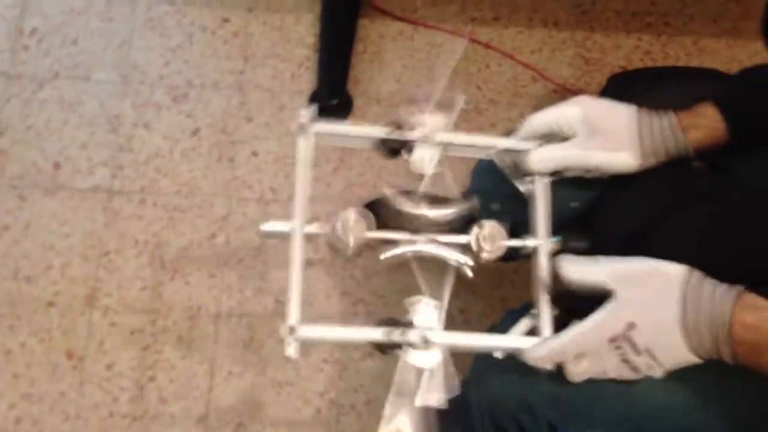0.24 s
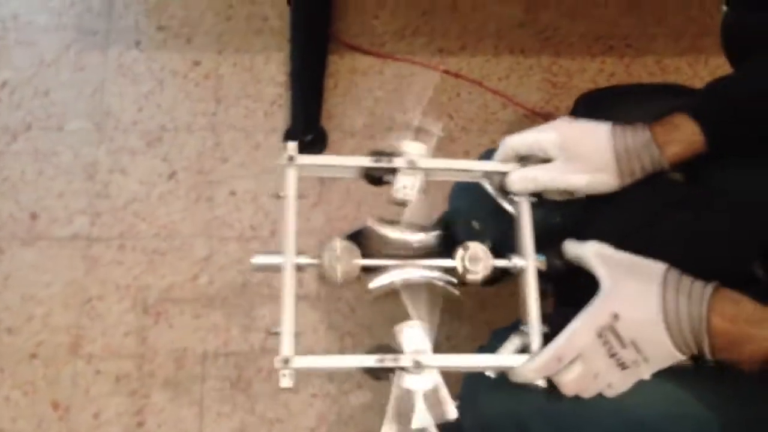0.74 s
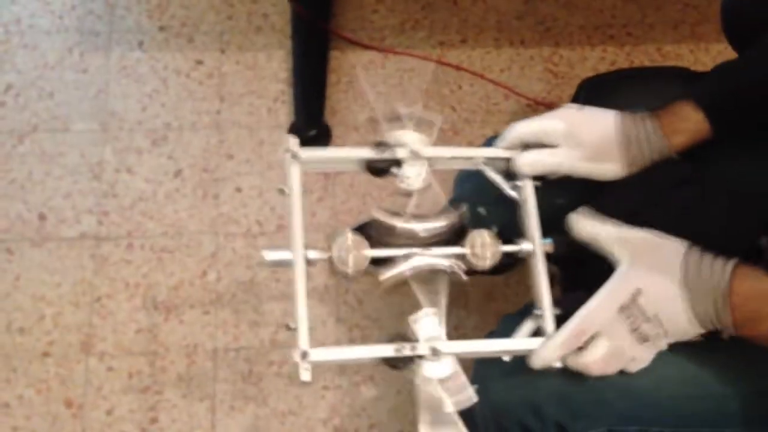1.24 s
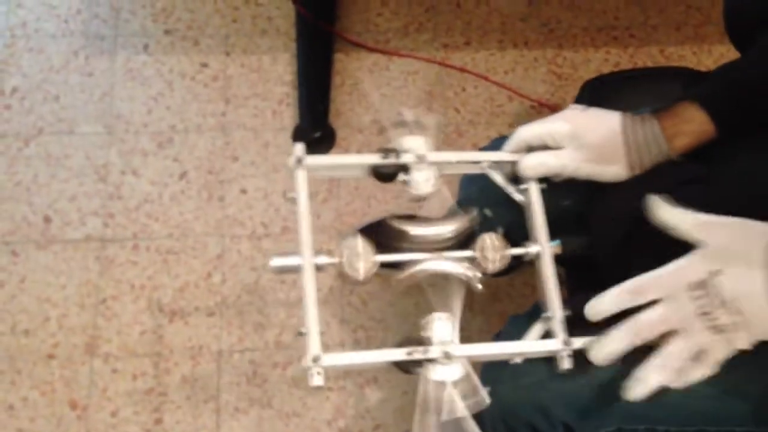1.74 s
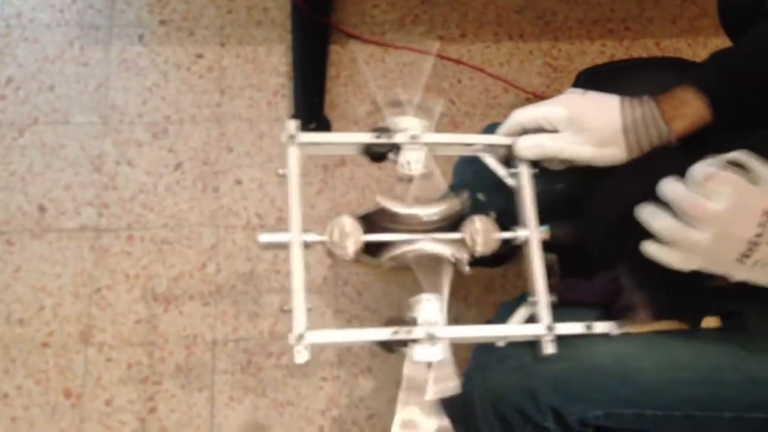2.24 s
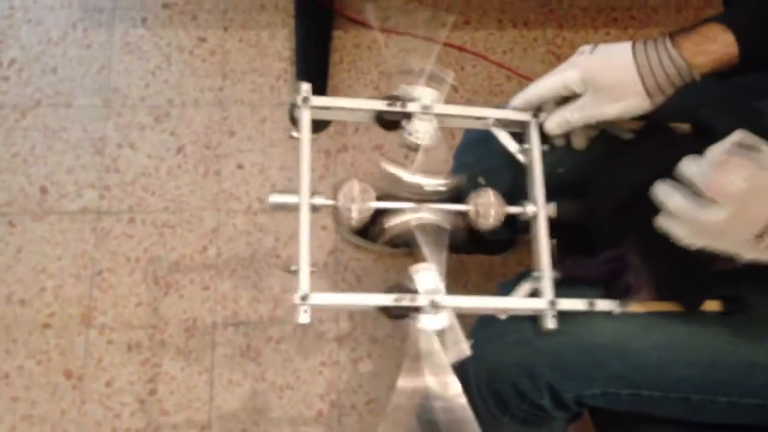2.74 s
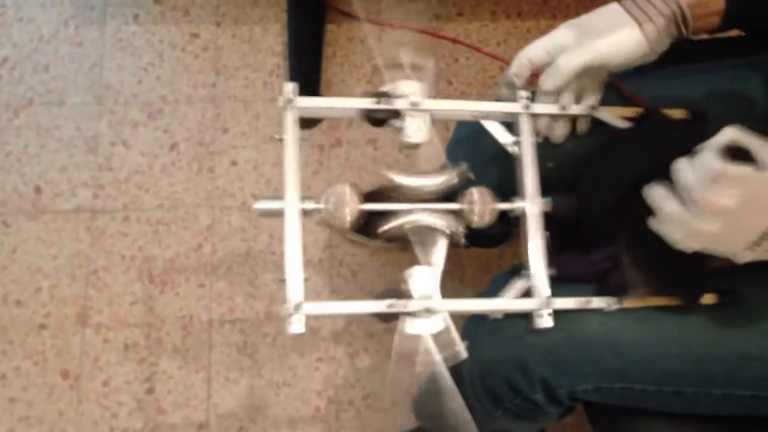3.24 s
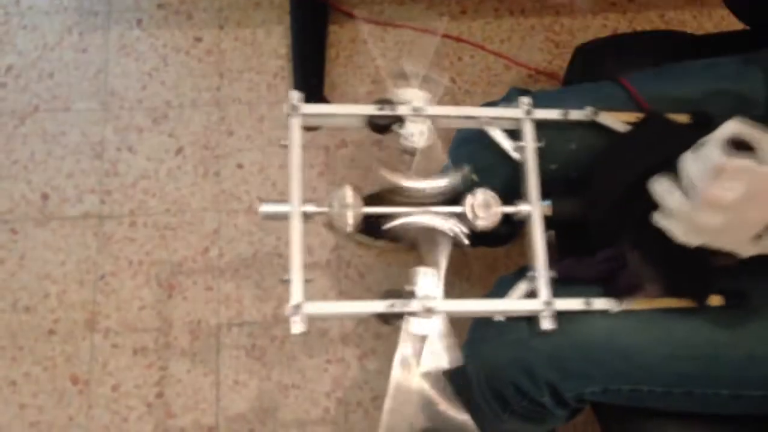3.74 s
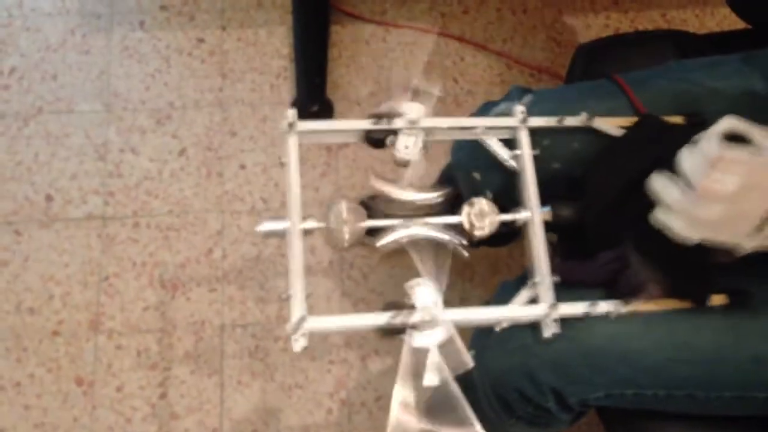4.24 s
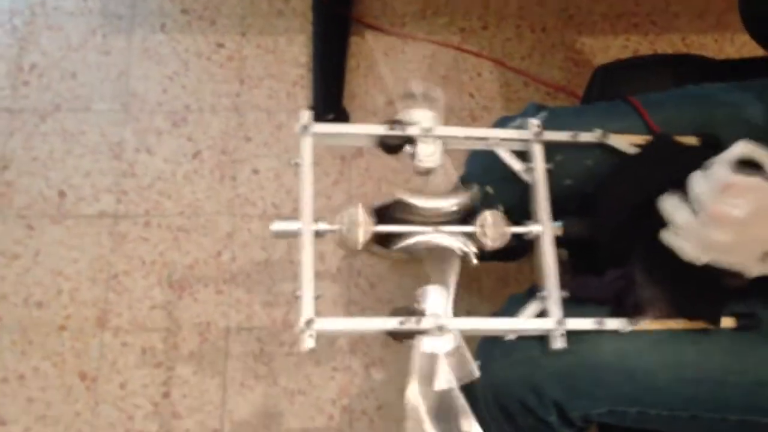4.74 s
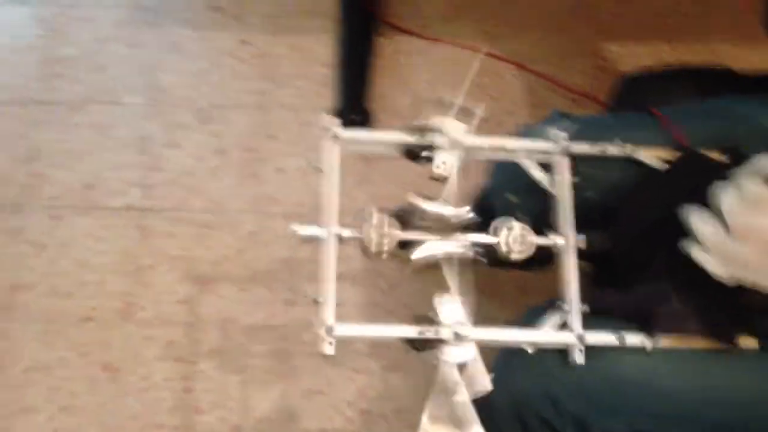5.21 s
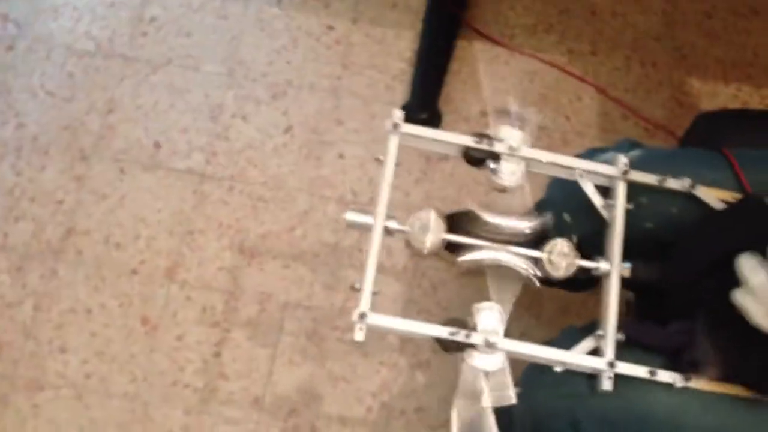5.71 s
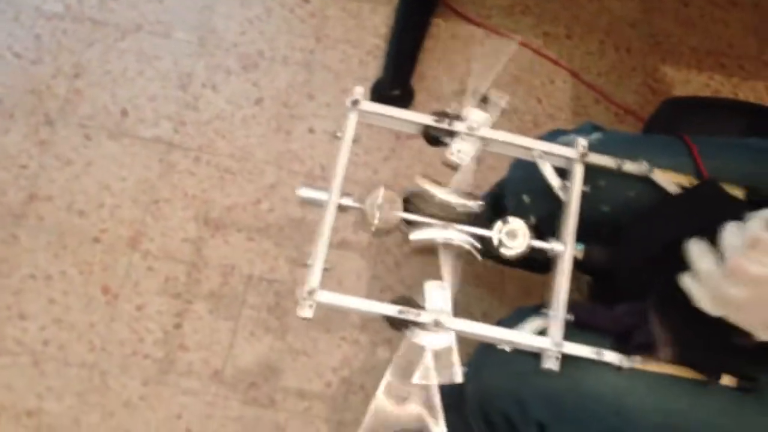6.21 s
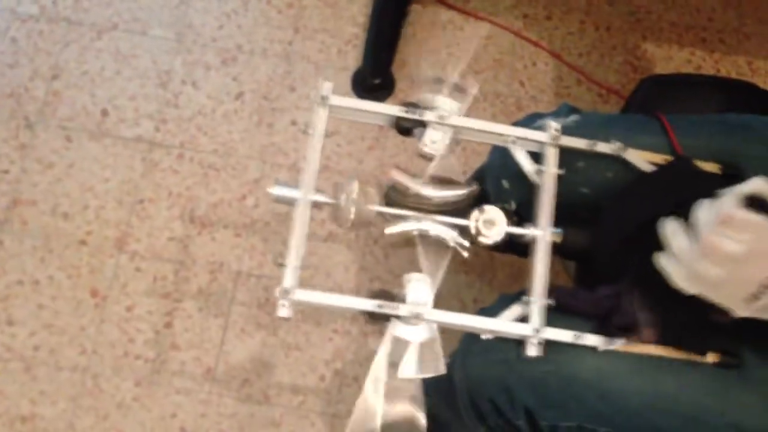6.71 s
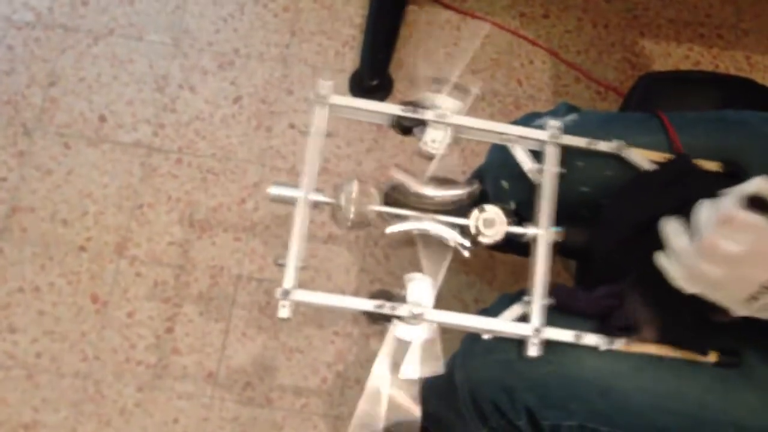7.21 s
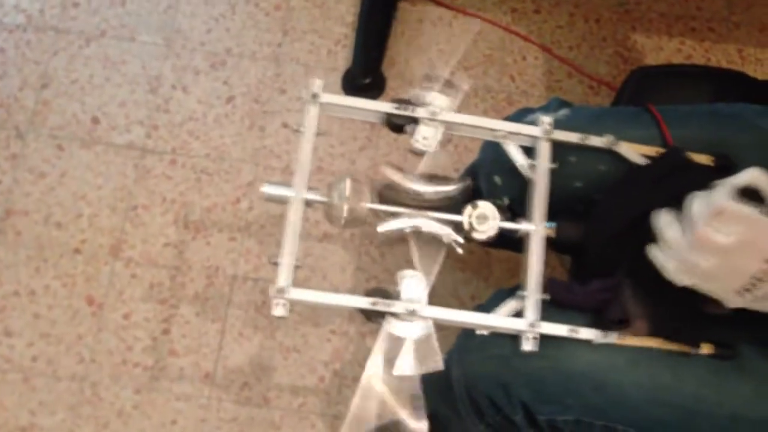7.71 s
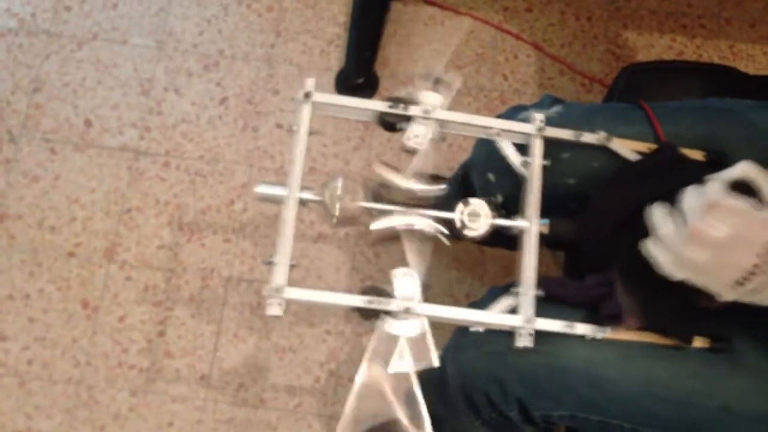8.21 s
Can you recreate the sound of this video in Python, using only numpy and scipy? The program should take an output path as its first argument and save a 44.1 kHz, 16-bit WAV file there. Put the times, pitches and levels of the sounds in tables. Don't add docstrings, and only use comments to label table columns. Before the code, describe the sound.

Close, bright clatter of a motorised flapping mechanism, film wings snapping and joints knocking over a low gear whir, turning uneven as it slows.

```python
import sys
import numpy as np
from scipy import signal
from scipy.io import wavfile
from scipy.ndimage import uniform_filter1d

SR = 44100
rng = np.random.default_rng(int(sys.argv[2]) if len(sys.argv) > 2 else 0)


def pcm_store(signal):
    levels = np.round(np.clip(np.atleast_2d(signal), -1, 1) * 32767)
    wavfile.write(sys.argv[1], SR, levels.astype(np.int16).T)


def decibels_to_gain(level_db):
    exponent = np.asarray(level_db, float) / 20
    return 10 ** exponent


N = 373086
T = np.arange(N) / SR

# time_s, strokes_done [count]
CRANK = [(-.0293, -1), (1.2593, 19), (1.6409, 25), (1.8371, 28), (2.0247, 31), (2.4806, 38), (2.8143, 43),
         (3.2688, 50), (3.8451, 59), (4.3005, 66), (4.7611, 73), (4.9712, 76), (5.4819, 83), (5.9331, 89),
         (6.329, 94), (6.6553, 98), (6.8258, 100), (8.4947, 120)]
# time_s, gear_whir_db, long_rod_db
GRIP = [(0, 0.5, -1.5), (.5, 1, 1), (.85, 2, -4), (1.2, -0.5, 1), (1.7, -1, 0.5), (2.3, 0.5, -1.5),
        (3, 1.5, -0.5), (3.6, 2, -1.5), (4.2, -1, 0), (4.8, 1.5, 0), (5.2, 2.5, -3.5), (5.8, -2, -0.5),
        (6.5, -2.5, -5), (7.2, -0.5, -2.5), (7.8, -2, -0.5), (8.46, -4.5, -2.5)]
# frequency_hz, level_db [dB per Hz]
FRAME_SLOW = [(470, -37), (800, -7.5), (1080, -2.5), (1190, -11), (1350, 1.5), (1510, -0.5), (1640, 2),
              (2060, -2.5), (2480, -1.5), (3020, -4), (3930, 0.5), (4610, -2.5), (6780, -5), (12300, -18.5),
              (15600, -18)]


def evened(x):
    return x / np.sqrt(np.mean(x ** 2) + 1e-20)


def read(points, hz):
    f, value = np.transpose(points)
    return np.interp(np.log(hz + 1), np.log(f + 1), value)


def held(curve, order):
    return np.interp(T, *np.transpose(curve)[[0, order]])


def add(mix, s, sound):
    part = mix[round(s * SR):][:len(sound)]
    part += sound[:len(part)]


def colour(x, spectrum):
    log_gain = np.log(decibels_to_gain(read(spectrum, abs(np.fft.fftfreq(4096, 1 / SR)))))
    taps = np.fft.ifft(np.exp(np.conj(signal.hilbert(log_gain)))).real[:2048]
    return signal.oaconvolve(x, taps / np.linalg.norm(taps))[:len(x)]


def resonate(x, hz, width):
    turn = np.exp(2j * np.pi * np.cumsum(hz * np.ones(N)) / SR)
    r = np.exp(-np.pi * abs(width) / SR)
    smooth = signal.lfilter([(1 - r) ** 2], np.convolve([1, -r], [1, -r]), x / turn)
    return 2 * (turn * smooth).real


def sway(seconds):
    size = round(seconds * SR)
    return evened(uniform_filter1d(uniform_filter1d(rng.standard_normal(N), size=size), size=size))


def grit(per_s, spread_db, hiss):
    size = decibels_to_gain(spread_db * np.minimum(rng.exponential(1, N), 5)) * (rng.random(N) < per_s / SR)
    impacts = evened(size * rng.choice([-1., 1.], N))
    return evened(impacts + hiss * rng.standard_normal(N))


def drive(order):
    # time_s, chatter_db, slap_db, rattle_db [set off by a slap]
    strength = [(0, -26, -33, -25.5), (.7, -28.5, -27, -27.5), (1.2, -29, -35, -29), (1.6, -27, -38, -26.5),
                (2.2, -26.5, -27, -26.5), (2.7, -26.5, -33.5, -43), (3.3, -25.5, -30.5, -30),
                (3.9, -26.5, -31, -33), (4.5, -25, -30, -30), (5, -28.5, -31.5, -29),
                (5.7, -29.5, -33, -28), (6.4, -29, -37.5, -28), (7.1, -29, -35, -33),
                (7.6, -38, -40, -27.5), (8, -30.5, -47, -29.5), (8.46, -35.5, -45, -32)]
    return held(strength, order)


def crank(strokes_done):
    s, done = np.transpose(CRANK)
    return np.interp(strokes_done, done, s)


def speed():
    rate = SR * np.gradient(np.interp(T, *np.transpose(CRANK)))
    return uniform_filter1d(uniform_filter1d(rate, SR * 2 // 3), SR // 3)


def strokes():
    # time_s, slap_db, rattle_db
    hard_strokes = [(2.614, -30, -31), (2.682, -24.5, -35), (2.9445, -28.5, -35), (3.3317, -27, -33),
                    (3.782, -30, -25), (3.91, -24.5, -23), (4.3678, -26.5, -33), (4.433, -23.5, -34),
                    (4.5649, -31, -23.5), (4.8283, -30, -21.5), (4.899, -25.5, -25.5), (5.337, -35, -27),
                    (5.409, -33, -26), (5.482, -36, -31), (5.706, -30, -24), (6.011, -33, -27.5),
                    (6.824, -28, -25), (6.9779, -38, -20.5), (7.148, -30, -23.5), (7.3155, -33, -23.5),
                    (7.477, -44, -16), (7.6516, -30.5, -29), (7.819, -30, -26), (7.986, -33, -20.5),
                    (8.155, -26, -18.5), (8.328, -28, -34), (8.4372, -50, -33)]
    # time_s, treble_peak_db
    snaps = [(0.0358, -21), (0.1007, -18), (0.1635, -19), (0.2294, -18), (0.2917, -18), (0.3551, -16),
             (0.4863, -18), (0.551, -16), (0.6135, -20), (0.6796, -18), (0.7432, -20), (0.8081, -21),
             (0.8714, -21), (0.9363, -16), (1.0655, -15), (1.259, -20), (1.3229, -21), (1.5778, -21),
             (1.6442, -19), (1.7065, -21), (1.7729, -19), (1.8367, -16), (2.0253, -16), (2.1545, -18),
             (2.2223, -16), (2.3496, -19), (2.4164, -25), (2.481, -18), (2.5476, -18), (2.6145, -20),
             (2.6813, -17), (2.9432, -17), (3.0081, -18), (3.074, -18), (3.2036, -19), (3.2685, -19),
             (3.3323, -15), (3.3972, -16), (3.461, -19), (3.5892, -17), (3.6521, -19), (3.717, -17),
             (3.7823, -17), (3.8462, -17), (3.91, -13), (4.1076, -16), (4.3001, -19), (4.368, -14),
             (4.4323, -15), (4.5645, -17), (4.8299, -20), (4.8998, -19), (5.2639, -21), (5.3368, -24),
             (5.4096, -24), (5.5563, -24), (5.6326, -20), (5.7079, -21), (5.8551, -23), (6.0117, -24)]
    # from_s, to_s, chance [0-1], slap_db and rattle_db [relative]
    other_wing = (3.5, 12, 0.17, -16, -17)
    uneven_db, jitter_s = 1.44, 0.00095
    n = np.arange(CRANK[-1][1])
    luck, dice = rng.standard_normal((len(n), 3)), rng.random(len(n))
    s = crank(n) + jitter_s * luck[:, 0]
    at = np.round(s * SR).astype(int)
    slap = drive(order=2)[at] + uneven_db * luck[:, 1]
    rattling = drive(order=3)[at] + uneven_db * luck[:, 2]
    rows = np.transpose([s, slap, rattling])
    start, end, chance, slap_db, rattle_db = other_wing
    other = np.transpose([crank(n + .5), slap + slap_db, rattling + rattle_db])
    other = other[(s > start) & (s < end) & (dice < chance)]
    for snap_s, peak_db in snaps:
        rows[abs(s - snap_s) < .012, :2] = snap_s, peak_db - 11.5
    rows[[abs(s - hard[0]).argmin() for hard in hard_strokes]] = hard_strokes
    return np.vstack([rows, other])


def handling():
    gusts = sway(3500 / SR)
    deep = signal.sosfilt(signal.butter(2, [40, 95], "band", fs=SR, output="sos"), rng.standard_normal(N))
    return decibels_to_gain(-75 - 1.1 * T + 4 * gusts) * evened(deep)


def reverberation(x):
    # frequency_hz, t60_s
    decay = [(300, 0.08), (2000, 1), (5000, 0.5), (12000, 0.55)]
    out = np.zeros(N)
    at = np.arange(200, SR - 20, 20)
    for k in range(3):
        taps = np.zeros(SR)
        taps[at + rng.integers(0, 20, len(at))] = rng.choice([-1., 1.], len(at))
        hz, t, z = signal.stft(taps, SR, nperseg=256)
        tail = signal.istft(z * decibels_to_gain(-60 * t / read(decay, hz)[:, None]), SR, nperseg=256)[1]
        turn = np.sqrt(2 / 3) * np.cos(np.pi * (11.3 * T + k / 3))
        out += signal.fftconvolve(x * turn, tail / np.linalg.norm(tail))[:N]
    return out


def bumps():
    # start_s, level_db, pitch_hz, t60_s
    thuds = [
        (5.133, -27, 190, 0.14),
        (5.17, -29, 555, 0.13),
        (5.665, -20, 657, 0.07),
    ]
    out, t = np.zeros(N), T[:SR // 3]
    for s, db, hz, t60 in thuds:
        envelope = decibels_to_gain(db - 60 * t / t60) * (1 - np.exp(-t / 0.0067))
        add(out, s, envelope * np.sin(2 * np.pi * hz * t * (.95 + 1.2 * t)))
    return out


def hum():
    # time_s, first_partial_db, second_partial_db
    partials = [(0, -61, -62), (.2, -56, -62), (.45, -59, -58), (.6, -59, -50), (1.3, -63, -50),
                (1.45, -66, -60), (1.6, -57, -60), (2.05, -66, -62), (2.3, -60, -58), (3, -61, -62),
                (3.3, -68, -60), (5, -74, -56), (6.2, -76, -54), (7.2, -78, -54), (8.46, -80, -58)]
    wobble = sway(1500 / SR)
    turns = 123.7 * T + .04 * wobble
    out = np.zeros(N)
    for k in (1, 2):
        level_db = held(partials, order=k) + 6 / k - 1 + 1.5 * np.roll(wobble, k * SR)
        out += decibels_to_gain(level_db) * np.sin(2 * np.pi * k * turns)
    return out


def gears():
    # multiple [of stroke rate], level_db, fall_db [lost per stroke/s of slowing]
    mesh = [(33.2, -6, 3), (40.3, -12, 2), (42.3, -9, 2), (44.5, -6, .5), (48.4, -6, -.2)]
    # multiple [of stroke rate], width_hz, level_db
    growl_bands = [(38.4, 124, -5), (44, 110, -2)]
    # time_s, share [of speed]
    play = [(0, .002), (2, .003), (2.8, .012), (5.6, .014), (6.3, .011), (8.46, .014)]
    # time_s, share [of speed]
    load = [(6.2, -.02), (6.9, 0), (7.1, .025), (7.4, .015), (7.7, -.02), (7.95, .035), (8.2, -.02)]
    wobble = sway(1500 / SR)
    rate = speed()
    slip = (T > 6) * held(load, order=1) + held(play, order=1) * wobble
    done = np.cumsum(rate * (1 + slip)) / SR
    lines, growl = np.zeros(N), np.zeros(N)
    for k, db, fall_db in mesh:
        level_db = db + 3 + fall_db * (rate - 15.5) + 2.5 * np.roll(wobble, round(k * SR))
        lines += decibels_to_gain(level_db) * np.sin(2 * np.pi * k * done)
    for k, width, db in growl_bands:
        growl += decibels_to_gain(db) * evened(resonate(rng.standard_normal(N), k * rate, width))
    return lines + decibels_to_gain(0.5 * (rate - 17.5)) * growl


def whir():
    # frequency_hz, level_db [dB per Hz]
    rumble = [(15, -74), (25, -41), (86, -20), (237, -3.5), (352, -5), (569, 0.5), (753, -5), (1050, -13.5),
              (1220, -9), (1300, -13.5), (1690, -25.5), (2860, -120)]
    # frequency_hz, width_hz, level_db
    modes = [(200, 28, -5), (250, 32, -6), (307, 14, -3), (400, 30, -8), (578, 36, -8), (650, 30, -9)]
    low = decibels_to_gain(-40.5 + held(GRIP, order=1)) * gears()
    low = low + decibels_to_gain(-38) * colour(rng.standard_normal(N), rumble)
    low = low + sum(decibels_to_gain(db) * resonate(low, hz, width) for hz, width, db in modes)
    return low + hum()


def jolts():
    # start_s, level_db
    clatters = [(5.708, -18.5), (5.895, -23), (6.024, -20), (6.826, -26), (7.15, -15.5), (7.32, -17),
                (7.652, -19.5), (7.756, -29), (7.819, -18.5), (8.329, -15), (8.435, -21)]
    shape, t = np.zeros(N), T[:SR // 10]
    for s, db in clatters:
        add(shape, s, decibels_to_gain(db - 60 * t / 0.11) * (1 - np.exp(-t / 0.0012)))
    clatter = colour(shape * grit(3000, spread_db=-17.0, hiss=0.66), FRAME_SLOW)
    rod = resonate(clatter, 3800 * (1 + 0.031 * sway(0.028)), 600)
    return decibels_to_gain(-3.5) * (clatter + decibels_to_gain(3.5) * rod)


def knocks():
    # start_s, peak_db, pitch_hz
    one_loose = [(0.0064, -16, 4000), (0.0466, -18, 2400), (0.1121, -21, 4440), (0.1756, -12, 7470),
                 (0.2405, -10, 4010), (0.2515, -19, 2450), (0.3583, -15.9, 2430), (0.3678, -14, 2330),
                 (0.3866, -18, 3210), (0.4235, -24, 6000), (0.432, -13, 2300), (0.4966, -15, 4160),
                 (0.5603, -6, 4460), (0.6254, -6, 4730), (0.6266, -17, 2190), (0.6896, -10, 4180),
                 (0.6959, -17, 2390), (0.7547, -13, 4900), (0.8196, -11, 4740), (0.8845, -8, 5000),
                 (1.0775, -11, 4090), (1.095, -19, 2430), (1.1028, -16, 3450), (1.145, -13, 2630),
                 (1.2059, -12, 2350), (1.2628, -18, 2610), (1.2703, -11, 5000), (1.3262, -17, 2610),
                 (1.3348, -12.5, 2080), (1.4625, -18, 2110), (1.546, -14, 2180), (1.5897, -23, 2430),
                 (1.6549, -15.3, 5340), (1.7193, -9.5, 4100), (1.7833, -16.0, 4180), (1.8467, -18, 1920),
                 (1.924, -18, 2370), (1.9292, -22, 1890), (1.9658, -20, 2610), (1.9746, -17, 2260),
                 (1.9927, -13, 2370), (2.0327, -15, 5450), (2.0388, -12.5, 2250), (2.1034, -14, 2150),
                 (2.1233, -16, 2370), (2.159, -22, 2350), (2.1677, -18, 4260), (2.193, -20, 3400),
                 (2.288, -14, 2670), (2.2971, -17, 2110), (2.3229, -16.4, 2130), (2.3537, -16.8, 2350),
                 (2.4193, -8, 3420), (2.4323, -15, 2270), (2.4546, -19, 4130), (2.4839, -11, 3450),
                 (2.4926, -12, 5360), (2.514, -13, 4480)]
    # start_s, peak_db, pitch_hz
    two_loose = [(2.5496, -9, 4950), (2.5817, -12.1, 5100), (2.5886, -12, 3680), (2.6167, -8.5, 3560),
                 (2.6273, -14.8, 5380), (2.6492, -8, 4500), (2.6827, -16, 5020), (2.694, -13.9, 5560),
                 (2.7154, -14, 4200), (2.7522, -11, 2780), (2.7604, -10, 5000), (2.7828, -11, 5230),
                 (2.8483, -16, 2090), (2.8903, -14, 5060), (2.946, -8, 3500), (2.9768, -12, 3120),
                 (3.01, -17, 3490), (3.0214, -9, 5400), (3.0443, -18, 2410), (3.051, -13.6, 3600),
                 (3.075, -11, 2600), (3.106, -12, 3170), (3.1419, -11, 3400), (3.1511, -18, 2630),
                 (3.1731, -14, 2390), (3.239, -8, 6650), (3.2712, -15, 3500), (3.313, -24, 2560),
                 (3.3336, -14, 8800), (3.3453, -13, 6240), (3.3665, -11, 5200), (3.399, -10, 3490),
                 (3.4297, -12, 3800), (3.4943, -10, 2470), (3.5592, -9, 5200), (3.686, -16, 2350),
                 (3.7296, -21, 3450), (3.7599, -17, 5020), (3.8152, -18, 3900), (3.8482, -20, 5120),
                 (3.857, -19, 2560), (3.9123, -23, 2650), (3.9213, -20, 4890), (3.943, -18, 2350),
                 (3.9877, -11, 5490), (4.01, -11.5, 2580), (4.0442, -12, 3660), (4.0756, -16, 4370),
                 (4.11, -15.1, 5230), (4.174, -16, 2690), (4.2051, -12, 6960), (4.2501, -23, 5000),
                 (4.2706, -18, 2860), (4.3353, -23, 6830), (4.3693, -21, 3770), (4.3798, -16, 6200)]
    # start_s, peak_db, pitch_hz
    slowing = [(4.4002, -14.0, 5190), (4.445, -15, 5530), (4.4665, -11, 5000), (4.474, -19, 3750),
               (4.4996, -13, 4670), (4.5765, -11, 4630), (4.5984, -7.5, 6800), (4.6341, -13, 3660),
               (4.643, -11, 5860), (4.7003, -15, 2700), (4.7088, -10, 3900), (4.73, -10, 5040),
               (4.7383, -17, 3490), (4.776, -15, 2540), (4.7968, -8, 4100), (4.8044, -16, 4070),
               (4.8337, -13, 2600), (4.8423, -7, 4230), (4.8675, -13, 6760), (4.9017, -12.1, 3500),
               (4.936, -6.5, 6540), (4.9722, -13.5, 2540), (5.0072, -19, 2050), (5.0576, -22, 6850),
               (5.082, -14, 2430), (5.119, -16, 5600), (5.191, -14, 5500), (5.2027, -14, 6930),
               (5.2276, -14.4, 2400), (5.3025, -14, 4440), (5.3404, -8, 6660), (5.3495, -11, 5210),
               (5.374, -13, 2350), (5.449, -12, 3960), (5.456, -15, 3830), (5.4965, -14.9, 3510),
               (5.5205, -15, 3880), (5.5585, -10, 3700), (5.571, -15, 5400), (5.5887, -15, 3480),
               (5.5954, -15, 3770), (5.6335, -16.9, 5070), (5.6703, -18, 5000), (5.7107, -11, 5100),
               (5.716, -13, 3800), (5.72, -15, 4900), (5.7245, -13, 4000), (5.745, -9, 3820),
               (5.7955, -19, 3720), (5.8737, -16.8, 5340), (5.898, -15, 3850), (5.9051, -11, 3830),
               (6.0272, -8, 4410), (6.1075, -19, 2370), (6.21, -18, 3700), (6.3443, -17, 5340),
               (6.4277, -23, 4780), (6.5883, -23, 6700), (6.6684, -13, 6830)]
    # start_s, peak_db, pitch_hz
    at_low_speed = [(6.7537, -22, 4720), (6.7651, -22, 3920), (6.8273, -7, 5400), (6.9417, -16, 3980),
                    (6.99, -10.8, 3950), (7.0018, -7, 6500), (7.01, -19, 3490), (7.0219, -15.8, 3730),
                    (7.0519, -18, 4350), (7.1543, -3, 4020), (7.1575, -9, 8200), (7.1608, -14.5, 5040),
                    (7.2535, -18, 12100), (7.2697, -14, 3830), (7.276, -14, 3190), (7.284, -14, 3900),
                    (7.319, -17, 5100), (7.324, -9, 4010), (7.335, -14, 3530), (7.4327, -18, 1760),
                    (7.4814, -20, 4840), (7.4868, -7, 3880), (7.4905, -11, 4100), (7.4958, -13, 4160),
                    (7.5032, -16, 4160), (7.5223, -17, 3810), (7.5742, -11, 3700), (7.586, -18, 14000),
                    (7.6167, -24, 1970), (7.658, -15, 3790), (7.7607, -14, 3620), (7.821, -18, 3750),
                    (7.9247, -17, 5080), (7.9466, -19, 3400), (7.9541, -17, 3980), (7.9913, -16, 4030),
                    (8.0042, -13, 3680), (8.0116, -13, 3600), (8.018, -19, 3940), (8.095, -17, 4330),
                    (8.1145, -18, 3750), (8.1577, -21, 3770), (8.1639, -1, 5230), (8.1715, -15, 4290),
                    (8.1763, -14, 6500), (8.195, -15.0, 3920), (8.2578, -26, 3600), (8.2673, -12, 3830),
                    (8.2812, -16, 1660), (8.3325, -15, 2980), (8.3375, -13, 2300), (8.4386, -17, 3960)]
    # frequency_hz, level_db [dB per Hz]
    crack_spectrum = [(1000, -12), (2000, -7.5), (3000, -6.5), (6000, 4), (8000, 0), (11000, -14),
                      (15000, -28)]
    ring_db, second_db = -3.5, -10
    rise_cycles = 1.15
    rows = [*one_loose, *two_loose, *slowing, *at_low_speed]
    cracks, rings, t = np.zeros(N), np.zeros(N), T[:SR // 60]
    luck = rng.random((len(rows), 2))
    for (s, db, hz), (other, late) in zip(rows, luck):
        add(cracks, s - .0003, decibels_to_gain([db - 3]))
        add(cracks, s + .0006 * late, -decibels_to_gain([db - 4 - 4 * other]))
        parts = ((hz, ring_db, 0), (2100 * 3.2 ** other, second_db, .0012 * late))
        for part_hz, part_db, lag in parts:
            u = t * part_hz / rise_cycles
            ring = decibels_to_gain(db + part_db) * u * np.exp(1 - u) * np.sin(2 * np.pi * part_hz * t)
            add(rings, s + lag - rise_cycles / part_hz, ring)
    rod_hz = np.interp(speed(), [13, 15], [3850, 2420]) * (1 + .04 * sway(.03))
    return decibels_to_gain(4) * colour(cracks, crack_spectrum) + rings + decibels_to_gain(18) * resonate(cracks, rod_hz, 600)


def pings(per_s, t60):
    rods = [1700, 2200, 2450, 2650, 3480, 3850, 4200, 5200]
    size = decibels_to_gain(3.0 * np.minimum(rng.exponential(1, N), 4)) * (rng.random(N) < per_s / SR)
    pitch = np.outer(rods, [.93, 1.01, 1.08]).ravel()
    part, t = rng.integers(0, len(pitch), N), T[:SR // 100]
    out = np.zeros(N)
    for k, hz in enumerate(pitch):
        ring = decibels_to_gain(-60 * t / t60) * np.sin(2 * np.pi * hz * t)
        out += signal.oaconvolve(size * (part == k), ring)[:N]
    return evened(out)


def shaking(beats, chatter_db, flare_db, rise, t60):
    kicks, t = np.zeros(N), T[:SR // 4]
    for s, _, db in beats:
        add(kicks, s + 0.0055, decibels_to_gain([2 * (db + flare_db)]))
    flare = (1 - np.exp(-t / rise)) * decibels_to_gain(-2 * 60 * t / t60)
    return np.sqrt(decibels_to_gain(2 * chatter_db) + abs(signal.oaconvolve(kicks, flare)[:N]))


def rattle(beats):
    # frequency_hz, level_db [dB per Hz]
    frame_fast = [(470, -37), (800, -4.5), (917, -7), (1190, -7.5), (1470, -1.5), (1820, -3.5), (2510, -1),
                  (2950, -3.5), (3380, -2), (3780, -2.5), (5230, -4), (7780, -6.5), (12900, -17.5),
                  (14700, -19), (15600, -9.5)]
    halts = np.zeros(N)
    for s, *_ in beats:
        add(halts, s - .027, signal.windows.hann(round(.032 * SR)))
    hush = decibels_to_gain(-6.0 * halts)
    impacts = hush * (grit(4000, spread_db=2.3, hiss=.8) + .26 * pings(350, t60=.018))
    slow = np.clip((15.1 - speed()) / 1.1, 0, 1)
    body = (1 - slow) * colour(impacts, frame_fast) + slow * colour(impacts, FRAME_SLOW)
    rod = signal.sosfilt(signal.butter(1, [1200, 1900], "band", fs=SR, output="sos"), body)
    body = body + (decibels_to_gain(held(GRIP, order=2)) - 1) * rod
    treble = signal.sosfiltfilt(signal.butter(1, 8200, "high", fs=SR, output="sos"), body)
    chatter_db = drive(order=1)
    treble_db = chatter_db - (1 - slow) - 0.5 * slow
    low_strength = shaking(beats, chatter_db + 0.18, flare_db=-3.0, rise=.007, t60=0.39)
    treble_strength = shaking(beats, treble_db, flare_db=12.5, rise=0.012, t60=0.088)
    return low_strength * (body - treble) + treble_strength * treble


def slaps(beats):
    # frequency_hz, level_db [dB per Hz]
    film = [(2500, -30), (5000, 24), (7000, 21), (10000, 18.5), (13000, 14), (15100, 15), (15900, -17)]
    shape, t = np.zeros(N), T[:SR // 30] / 0.0011
    for s, db, _ in beats:
        add(shape, max(s - .0007, 0), decibels_to_gain(db + 11.0) * t ** 2 * np.exp(-t))
    return colour(shape * grit(4000, spread_db=3.5, hiss=0.92), film)


def scene():
    beats = strokes()
    hits = rattle(beats) + slaps(beats) + knocks() + jolts()
    return (decibels_to_gain(-0.7) * hits + decibels_to_gain(-5.5) * reverberation(hits) + whir() + bumps())[None]


def band_limit(x):
    return signal.sosfilt(signal.butter(12, 15950, fs=SR, output="sos"), x)


def record(dry):
    thin = signal.sosfilt(signal.butter(4, 125, "high", fs=SR, output="sos"), dry) + handling()
    thin = thin + decibels_to_gain(-12) * resonate(thin[0], 15050, 700)
    inner, edge, top = (signal.firwin(601, hz, window=("kaiser", 7), fs=SR)[None]
                        for hz in (15020, 15270, 15780))
    air = signal.oaconvolve(thin, top - edge, "same")
    bright = np.diff(thin, 4, prepend=np.zeros((1, 4))) ** 2
    power = uniform_filter1d(bright, size=200) / uniform_filter1d(bright, size=20000)
    loud_snaps = 1. * (power > np.quantile(power, .98))
    gate = np.minimum(3 * uniform_filter1d(loud_snaps, size=300), 1)
    ragged = decibels_to_gain(-2 + 3.5 * np.clip(sway(.015), -2.5, 2.5))
    rim = ragged * signal.oaconvolve(thin, edge - inner, "same")
    mix = signal.oaconvolve(thin, inner, "same") + rim + decibels_to_gain(-18) * gate * air
    return band_limit(mix)


dry = scene()
out = record(dry)
pcm_store(out)
```